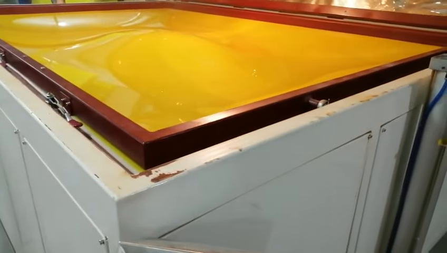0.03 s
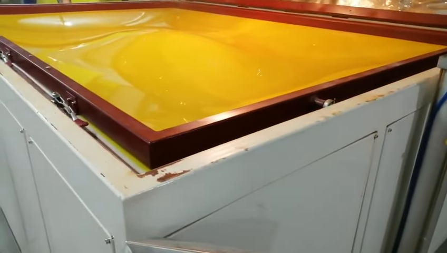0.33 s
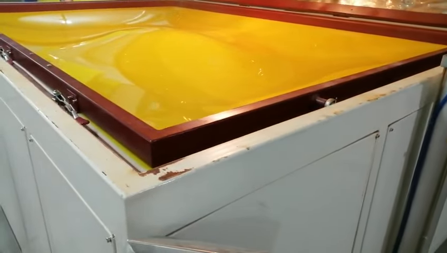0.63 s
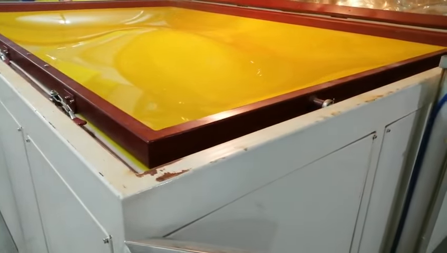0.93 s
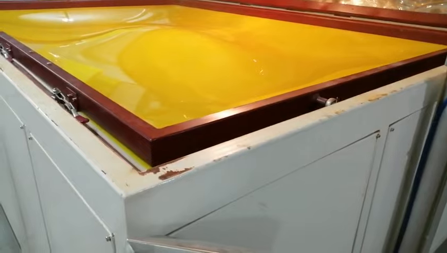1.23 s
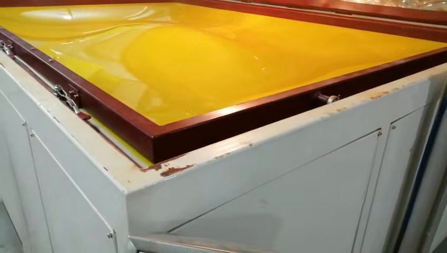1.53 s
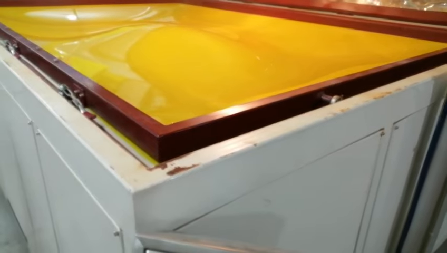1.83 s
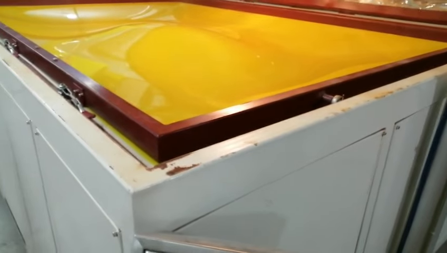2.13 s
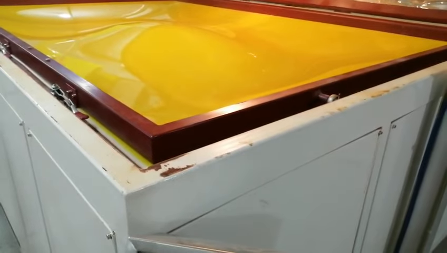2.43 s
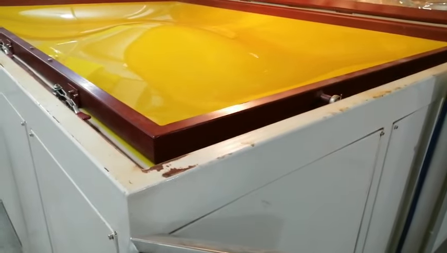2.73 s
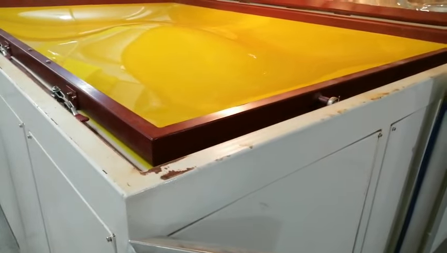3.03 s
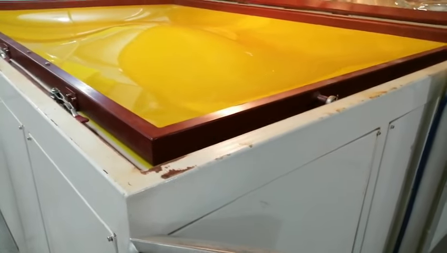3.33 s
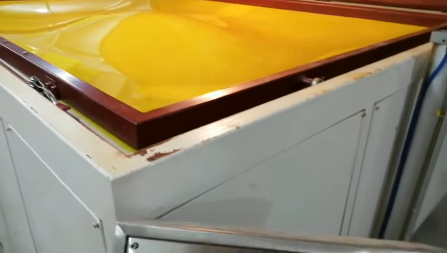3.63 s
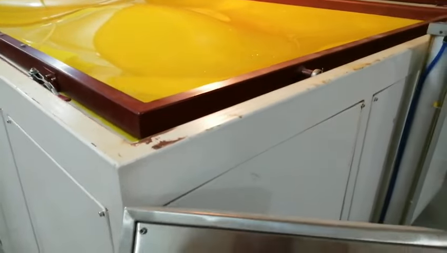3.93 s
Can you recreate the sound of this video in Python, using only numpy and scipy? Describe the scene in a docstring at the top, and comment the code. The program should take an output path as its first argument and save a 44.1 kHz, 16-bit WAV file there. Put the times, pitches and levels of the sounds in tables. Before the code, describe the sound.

A vacuum forming machine whistles over its pump, the whistle falls, then air rushes out.

```python
"""A vacuum forming machine draws a hot plastic sheet over its mould. From the start the pump throbs
in the cabinet while air leaking past the frame hisses and whistles. At 1.25 s the whistle drops a
step; from 2 s it slides down and fades as the pump labours, and the cabinet booms briefly.
Near 2.6 s a valve opens, the pump eases and a bright rush of air takes over, slowly sagging."""
import sys
import numpy as np
from scipy import signal
from scipy.fft import rfft, irfft
from scipy.io import wavfile

SR = 44100
rng = np.random.default_rng(int(sys.argv[2]) if len(sys.argv) > 2 else 0)


def unload_wav(signal):
    """Save mono or channel-first audio to the path in sys.argv[1] as 16-bit WAV at rate SR, clipped to [-1, 1]."""
    wavfile.write(
        sys.argv[1],
        SR,
        np.round(np.clip(np.atleast_2d(signal).T, -1, 1) * 32767).astype(np.int16),
    )


N = 176400
TIME_S = np.arange(N) / SR
BIN_HZ = np.arange(N // 2 + 1) * SR / N


def from_db(db):
    """Decibels to gain."""
    return 10 ** (np.asarray(db) / 20)


def automation(points):
    """A breakpoint curve over time, read at every sample."""
    return np.interp(TIME_S, *np.transpose(points))


def per_bin(points):
    """A breakpoint curve over log frequency, read at every bin."""
    hz, value = np.transpose(points)
    return np.interp(np.log(BIN_HZ + 1e-3), np.log(hz), value)


def equalise(x, gains):
    """An EQ with one gain per frequency bin."""
    return irfft(rfft(x) * gains, N)


def drift(rate_hz):
    """A smooth random modulator of spread 1, rolling off above rate_hz."""
    hop, settle = 40, 2000
    pole = np.exp(-2 * np.pi * rate_hz * hop / SR)
    noise = rng.standard_normal(N // hop + settle + 2)
    slow = signal.lfilter([1], [1, -2 * pole, pole * pole], noise)[settle:]
    return np.interp(np.arange(N) / hop, np.arange(len(slow)), slow / slow.std())


def reverb_tail(t60_s, samples):
    """Diffuse reflections: decaying noise of unit energy, different on each side."""
    tail = rng.standard_normal((2, samples)) * np.exp(-np.log(1000) * TIME_S[:samples] / t60_s)
    return tail / np.sqrt(np.sum(tail ** 2, axis=1, keepdims=True))


# Stereo image of the air noise: (frequency [Hz], left-right correlation [0..1])
AIR_CORRELATION = [(30, 1), (300, 0.76), (550, 0.32), (1000, 0), (2500, 0), (5500, 0.2), (9000, 0),
                   (15000, 0)]

def air_noise(spectrum):
    """Turbulence with the given spectrum, centred in the bass and wide above."""
    mid, side = rfft(rng.standard_normal((2, N)))
    alike = per_bin(AIR_CORRELATION)
    pair = np.sqrt(1 + alike) * mid + np.sqrt(1 - alike) * side * [[1], [-1]]
    return irfft(pair * from_db(per_bin(spectrum)), N) * np.sqrt(SR) / 2


def hum_tone(hz, db, waver=0.13):
    """One slightly wavering machine tone; higher tones sit wider in the stereo image."""
    spread_rad = np.clip(0.11 * (hz / 400) ** 2 * rng.choice([-1, 1]), -.8, .8)
    phase = 2 * np.pi * (hz * TIME_S + rng.random()) + spread_rad * np.array([[1], [-1]])
    tone = (1 + waver * drift(2.4)) * np.sin(phase) + waver * drift(2.5) * np.cos(phase)
    return np.sqrt(2) * from_db(db) * tone


# Drone of the pump: (multiple of the turning rate [x], level [dB])
PUMP_HARMONICS = [(6, -63), (8, -55), (10, -57.5), (12, -59), (14, -49.5), (16, -50), (18, -57),
                  (20, -51.5), (22, -45), (24, -56.5), (26, -60), (28, -63), (30, -61), (32, -59.5),
                  (39, -61.5), (41, -59.5), (44, -57.5), (48, -54.5), (49, -50.5), (54, -56.5), (55, -50),
                  (57, -55), (59, -58.5)]
# Hum of the motors: (frequency [Hz], level [dB])
MOTOR_HUM = [(137.9, -59.5), (144.7, -53), (289.3, -50)]
# Exhaust and rumble: (frequency [Hz], density [dB per Hz])
EXHAUST_SPECTRUM = [(20, -94), (45, -90), (80, -71), (110, -80), (140, -61.5), (190, -79), (300, -71.5),
                    (450, -76), (660, -76.5), (900, -69), (1100, -78), (1300, -80), (1800, -78),
                    (2600, -83.5), (5000, -100)]
# Swell of the pump under load: (time [s], gain [dB])
LOAD_SWELL = [(0, 0), (1.3, 0), (2.1, 1.5), (2.35, 4), (2.58, 4.5), (2.7, -0.5), (4, 0)]

def pump(turn_hz=18.972):
    """Pump and motor tones over an exhaust that puffs twice a turn; both swell under load."""
    load_db = automation(LOAD_SWELL)
    partials = [(round(multiple) * turn_hz, db) for multiple, db in PUMP_HARMONICS] + list(MOTOR_HUM)
    drone = sum(hum_tone(hz, db) for hz, db in partials) * from_db(0.93 * load_db)
    turn = 2 * np.pi * turn_hz * TIME_S
    puffs = 1 + 0.28 * np.cos(2 * turn) + 0.15 * np.cos(turn)
    return drone + air_noise(EXHAUST_SPECTRUM) * puffs * from_db(load_db)


def cabinet_boom(at_s=2.35, width_s=0.044):
    """The cabinet booms briefly as the load on the pump nears its peak."""
    return hum_tone(hz=137, db=-36.5) * np.exp(-((TIME_S - at_s) / width_s) ** 2)


def panel_echoes(x, wet=0.49):
    """Close reflections between the sheet and the panels put a fine ripple on the spectrum."""
    echoes = reverb_tail(t60_s=0.17, samples=N)
    return equalise(x, 1 + wet * rfft(echoes)) / np.sqrt(1 + wet ** 2)


# Colour of the leak's hiss: (frequency [Hz], density [dB per Hz])
LEAK_SPECTRUM = [(1200, -78.5), (2300, -81), (3150, -75), (3850, -83), (4400, -79.5), (5100, -69.5),
                 (5800, -71.5), (6600, -71), (7700, -87), (8700, -82), (10000, -74.5), (11300, -84.5),
                 (13500, -83), (15000, -87), (15700, -87)]
# Fader ride following the flow through the leak: (time [s], gain [dB])
LEAK_RIDE = [(0, 0.5), (2, 1), (2.5, 1), (2.8, 0), (4, -1.5)]

def leak_hiss(flicker_db=0.35):
    """A near-steady bed of hiss from air drawn past the frame."""
    hiss = panel_echoes(air_noise(LEAK_SPECTRUM))
    return hiss * from_db(automation(LEAK_RIDE) + flicker_db * drift(18))


def sink_pitch(x, age_s, share_per_s=.02, core_top_hz=8030):
    """The core of the rush bends down in pitch as it ages; the treble above it stays."""
    core = rfft(x) * (BIN_HZ < core_top_hz)
    oversampled = 4 * irfft(core, 4 * N)
    slowed_s = TIME_S - share_per_s * age_s ** 2 / 2
    sunk = [np.interp(slowed_s * 4 * SR, np.arange(4 * N), side) for side in oversampled]
    return x - irfft(core, N) + np.array(sunk)


def resonance(centre_hz, width_hz):
    """A narrow bell curve over frequency, 1 at its centre."""
    return 1 / (1 + (2 * (BIN_HZ - centre_hz) / width_hz) ** 2)


# Colour of the valve's rush: (frequency [Hz], density [dB per Hz])
RUSH_SPECTRUM = [(1500, -85), (3100, -71.5), (3900, -81.5), (4520, -73.5), (5030, -60.5), (6280, -61),
                 (7080, -65.5), (8000, -75.5), (9000, -71), (9900, -67.5), (10800, -74), (11600, -72.5),
                 (13800, -78), (14900, -69), (15800, -91)]
# Peaks and a notch from the valve's air passages: (centre [Hz], width [Hz], gain [dB])
PASSAGE_EQ = [(3810, 11, 7), (4920, 23, 8), (5030, 15, 3), (6000, 21, 0), (6400, 27, -9), (11570, 120, 5.5)]

def valve_rush(opens_at_s=2.565, attack_s=.065, sag_db_per_s=1.66, flicker_db=0.4):
    """The valve opens; its rush rings in the air passages, sagging and sinking as pressure evens out."""
    age_s = np.maximum(TIME_S - opens_at_s, 0)
    passages_db = sum(db * resonance(centre, width) for centre, width, db in PASSAGE_EQ)
    rush = sink_pitch(air_noise(RUSH_SPECTRUM), age_s)
    rush = panel_echoes(equalise(rush, from_db(passages_db)))
    # A breathy tone at the valve's edge fades faster than the rush.
    edge = equalise(rng.standard_normal((2, N)), resonance(centre_hz=5115, width_hz=28))
    edge = edge / edge.std() * from_db(-39.5 - 10 * age_s)
    ride_db = 0.8 - sag_db_per_s * age_s + flicker_db * drift(18)
    return (rush + edge) * np.minimum(age_s / attack_s, 1) * from_db(ride_db)


# Pitch line of the whistle, a step and then a dive: (time [s], pitch [Hz])
PITCH_LINE = [(0, 4884), (.13, 4893), (.42, 4873), (1.247, 4871), (1.258, 4750), (1.35, 4745), (1.43, 4718),
              (1.74, 4712), (1.975, 4686), (1.984, 4805), (2.012, 4815), (2.022, 4620), (2.06, 4380),
              (2.12, 4080), (2.2, 3740), (2.34, 3420), (2.58, 3170), (2.9, 2500)]
# Unsteadiness of the jet: (time [s], pitch spread [Hz])
FLUTTER_DEPTH = [(0, 12), (.4, 6), (1.2, 6), (1.45, 22), (1.72, 20), (1.82, 7), (1.98, 7), (2.08, 55),
                 (2.35, 40)]
# Mix of the partials: (multiple of the pitch [x], trim [dB], tremble depth [dB])
PARTIAL_MIX = [(1, -1.3, 0.5), (2, -20.5, 13.5), (3, -24.5, 10)]
# Envelope of the fundamental: (time [s], level [dB])
FUNDAMENTAL_ENVELOPE = [(0, -27), (.26, -24), (.35, -19), (.445, -24.5), (.485, -20.5), (.58, -20),
                        (.612, -37), (.655, -20), (.745, -20.5), (.772, -28), (.805, -19.5), (.87, -22.5),
                        (1.02, -20.5), (1.06, -30), (1.1, -26), (1.138, -35), (1.162, -17.5), (1.28, -25.5),
                        (1.37, -24), (1.5, -29), (1.77, -27), (1.82, -22.5), (1.96, -23), (2.04, -25),
                        (2.11, -34), (2.22, -37), (2.3, -41.5), (2.4, -39), (2.57, -42), (2.64, -47),
                        (2.95, -70)]
# Envelope of the overtones, flaring again late in the dive: (time [s], level [dB])
OVERTONE_ENVELOPE = [(0, -24), (.6, -25.5), (1.2, -25.5), (2.02, -24), (2.13, -34), (2.3, -32), (2.37, -27),
                     (2.55, -32), (2.8, -55)]
# Room send of the fundamental: (time [s], share of power [0..1])
FUNDAMENTAL_SEND = [(1.2, .05), (1.4, .1), (1.95, .12), (2.0, .85), (2.07, .65), (2.2, .3), (2.5, .45)]

def leak_whistle(overtone_send=.35, sputter_ceiling_db=5):
    """A sputtering edge tone with two overtones; as the jet breaks up, it smears into the room."""
    flutter_hz = automation(FLUTTER_DEPTH)
    pitch_hz = automation(PITCH_LINE) + flutter_hz * drift(90)
    phase = 2 * np.pi * np.cumsum(pitch_hz) / SR
    unrest_db = 0.18 * np.minimum(flutter_hz, 21.3)  # more flutter, more sputter, up to a limit
    direct = room_bus = 0
    for multiple, trim_db, tremble_db in PARTIAL_MIX:
        if round(multiple) == 1:
            envelope, send = FUNDAMENTAL_ENVELOPE, automation(FUNDAMENTAL_SEND)
        else:
            envelope, send = OVERTONE_ENVELOPE, overtone_send
        sputter_db = np.minimum((tremble_db + unrest_db) * drift(82), sputter_ceiling_db)
        gain = from_db(automation(envelope) + trim_db + sputter_db)
        tone = np.sqrt(2) * np.sin(round(multiple) * phase) * gain
        direct += tone * np.sqrt(1 - send)
        room_bus += tone * np.sqrt(send)
    room = reverb_tail(t60_s=0.52, samples=SR // 2)
    return direct + signal.fftconvolve(room_bus[None], room, axes=1)[:, :N]


# Resonance of the gap, colouring the whistle: (frequency [Hz], gain [dB])
GAP_EQ = [(5000, -1.5), (6800, 4), (8800, -2.5), (9600, 7), (10150, 6.5), (11000, -8), (13000, -4),
          (14500, 4)]

def scene():
    """The whole machine, heard from a corner of its frame."""
    whistle = equalise(leak_whistle(), from_db(per_bin(GAP_EQ)))
    return whistle + leak_hiss() + valve_rush() + pump() + cabinet_boom()


# Colour of the two microphones: (frequency [Hz], left minus right [dB])
MIC_BALANCE = [(40, 6), (130, 3), (350, 7), (900, 3.5), (1300, 2), (2200, 7), (3200, 7), (4200, 10),
               (4850, 16.5), (5800, 15.5), (7000, 7), (8000, 1.5), (9700, -14.5), (11000, -3), (12300, -1),
               (14500, 11.5)]

def record(dry):
    """Each microphone colours the sound in its own way; a steep high cut takes off the top."""
    ratio = from_db(per_bin(MIC_BALANCE))
    gains = np.array([ratio, np.ones_like(ratio)]) * np.sqrt(2 / (1 + ratio ** 2))
    high_cut = signal.ellip(10, .1, 90, 15750, fs=SR, output="sos")
    return signal.sosfilt(high_cut, equalise(dry, gains))


dry = scene()
out = record(dry)
unload_wav(out)
```